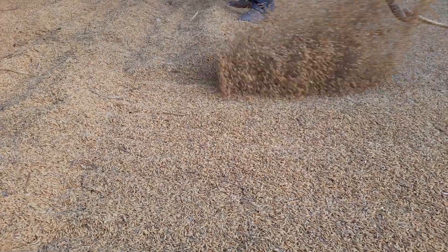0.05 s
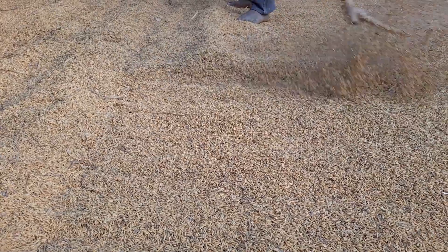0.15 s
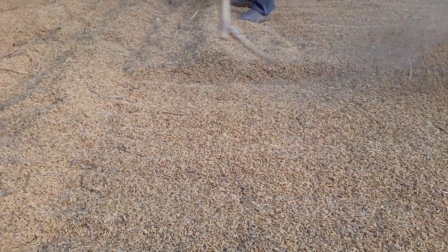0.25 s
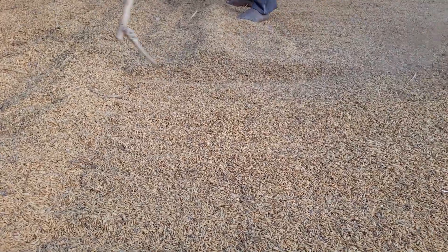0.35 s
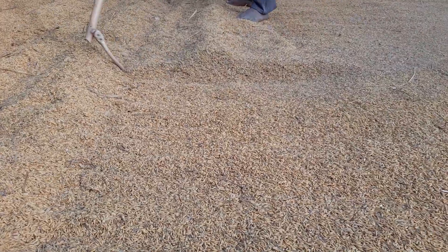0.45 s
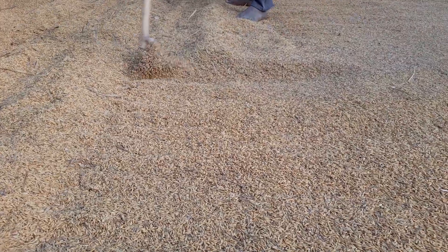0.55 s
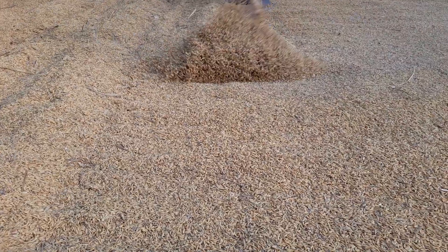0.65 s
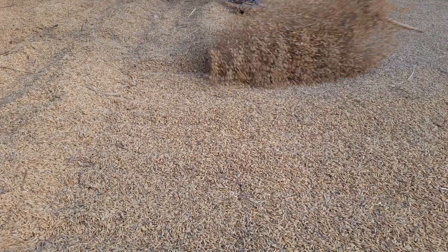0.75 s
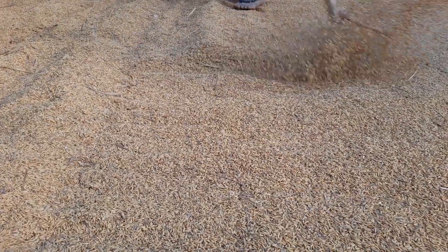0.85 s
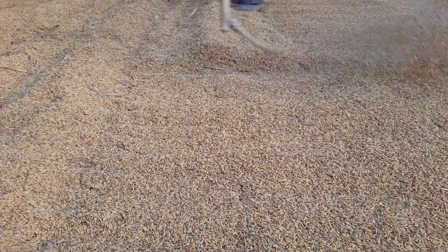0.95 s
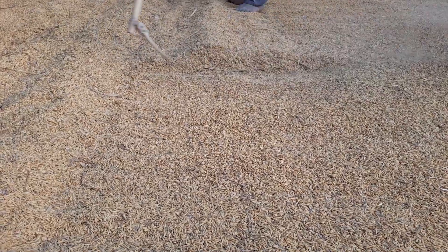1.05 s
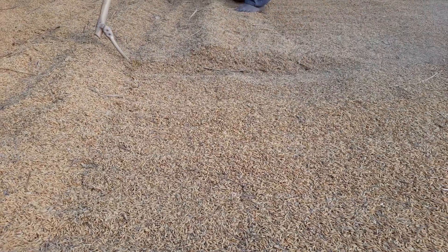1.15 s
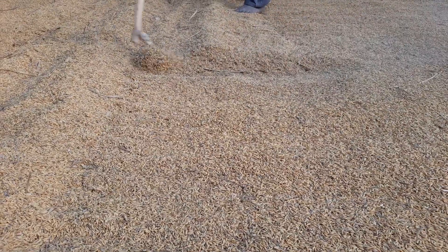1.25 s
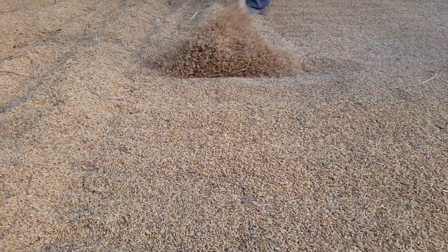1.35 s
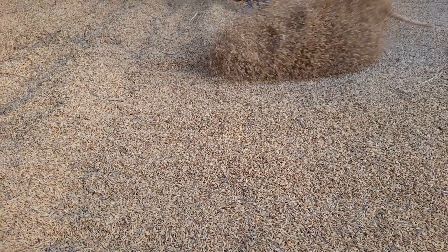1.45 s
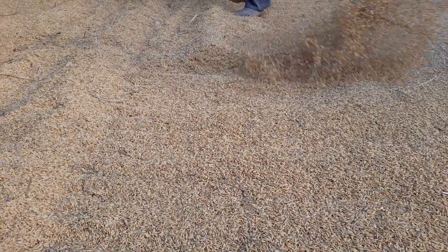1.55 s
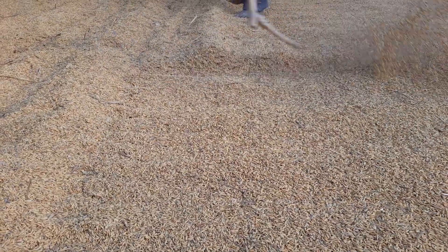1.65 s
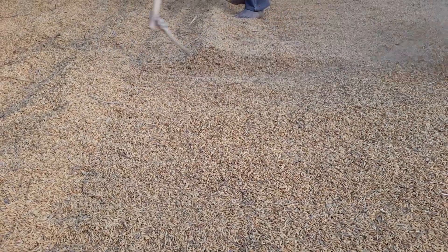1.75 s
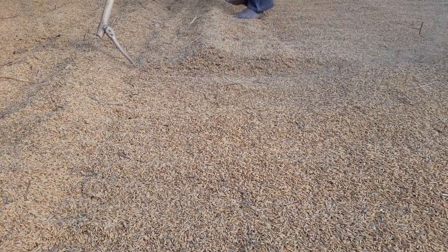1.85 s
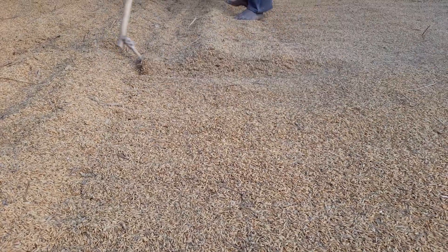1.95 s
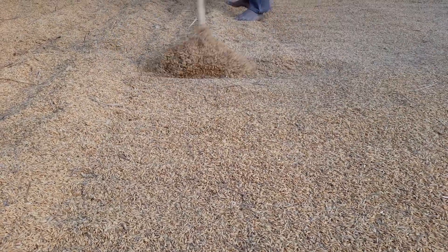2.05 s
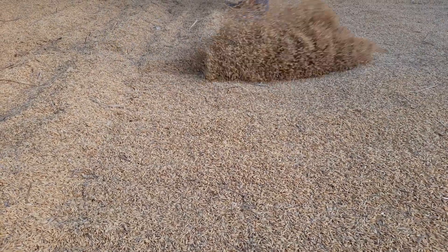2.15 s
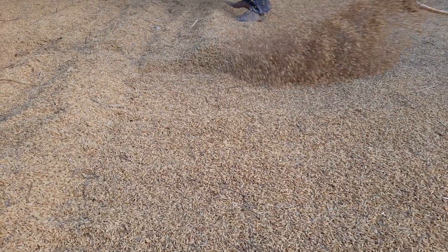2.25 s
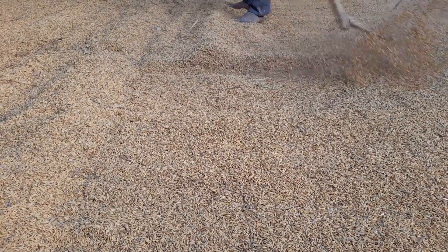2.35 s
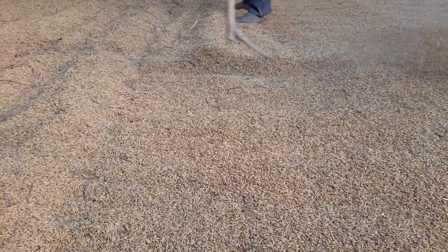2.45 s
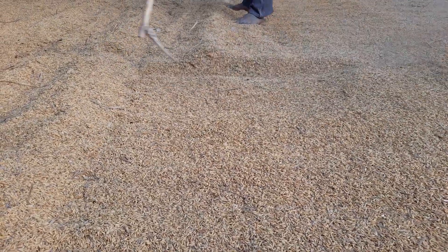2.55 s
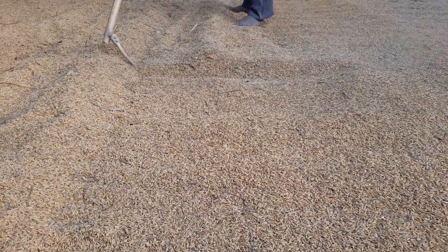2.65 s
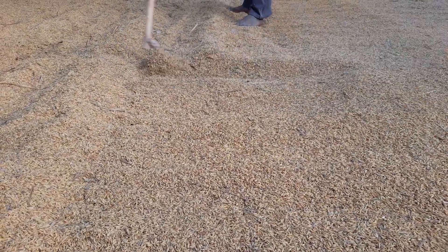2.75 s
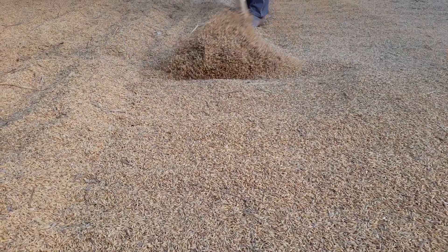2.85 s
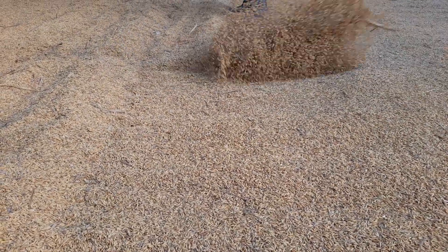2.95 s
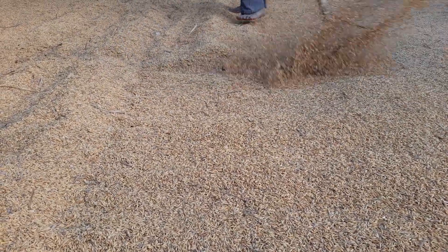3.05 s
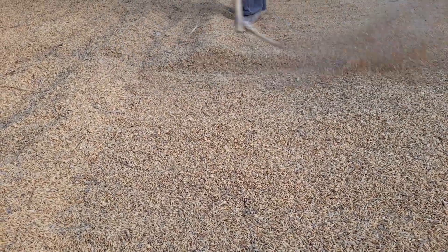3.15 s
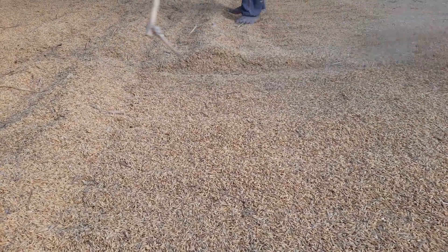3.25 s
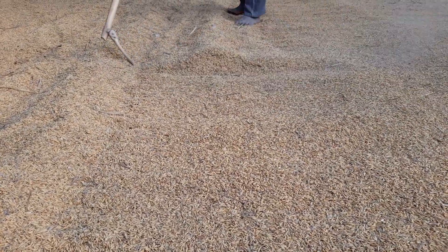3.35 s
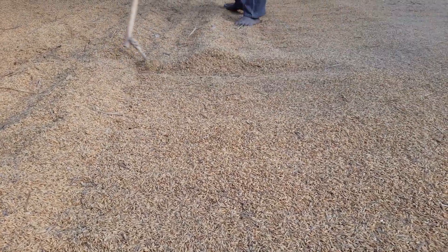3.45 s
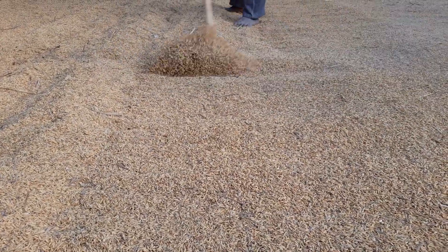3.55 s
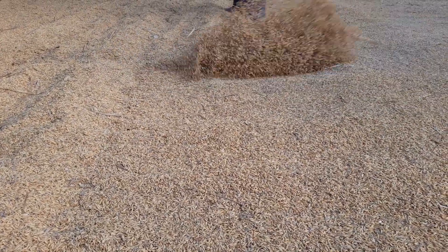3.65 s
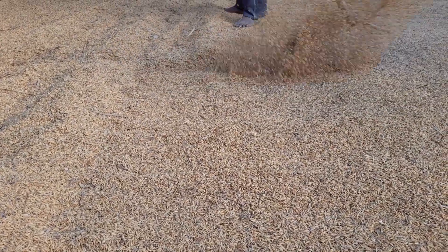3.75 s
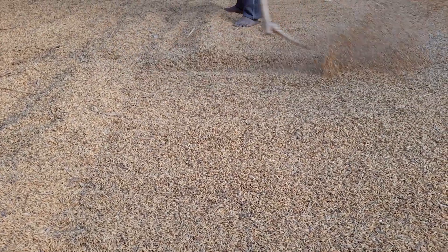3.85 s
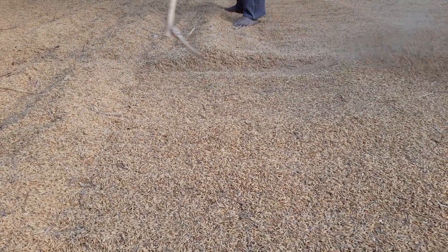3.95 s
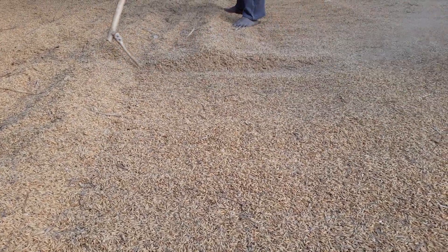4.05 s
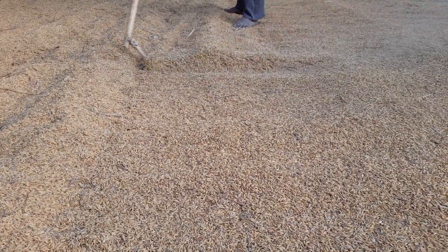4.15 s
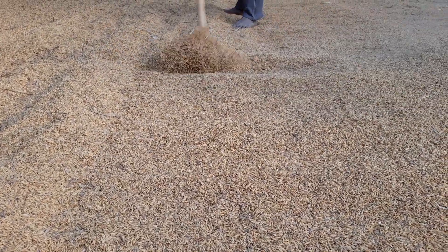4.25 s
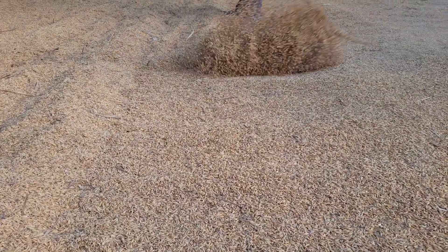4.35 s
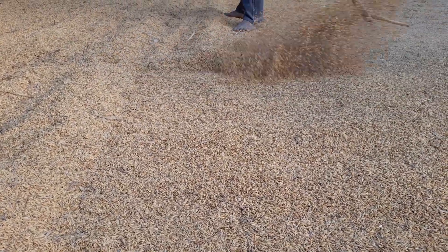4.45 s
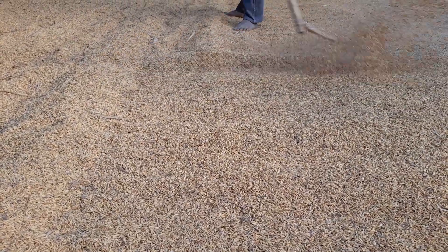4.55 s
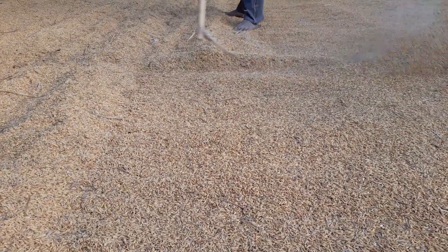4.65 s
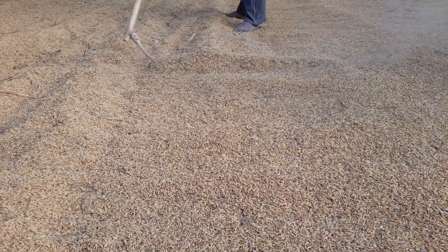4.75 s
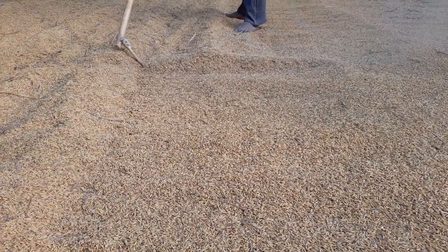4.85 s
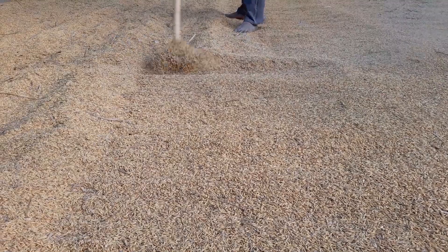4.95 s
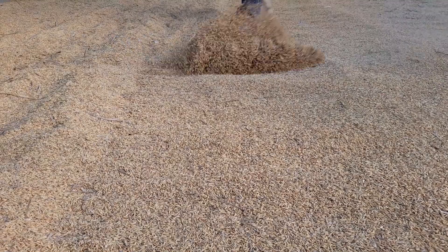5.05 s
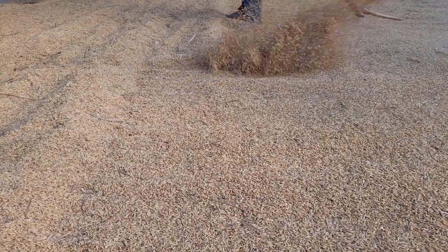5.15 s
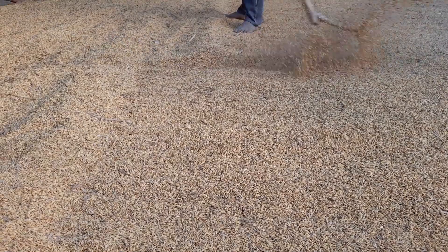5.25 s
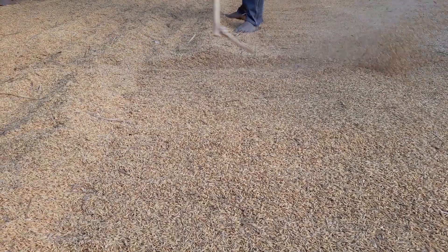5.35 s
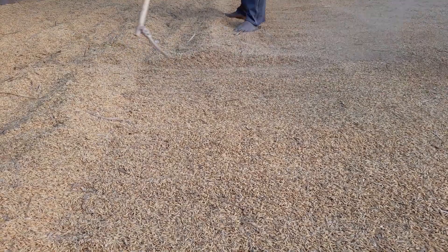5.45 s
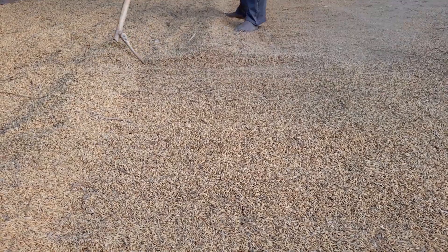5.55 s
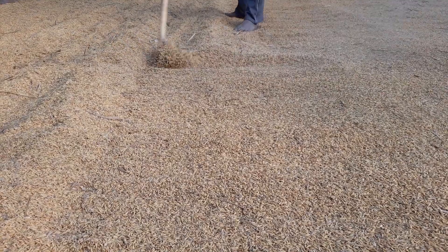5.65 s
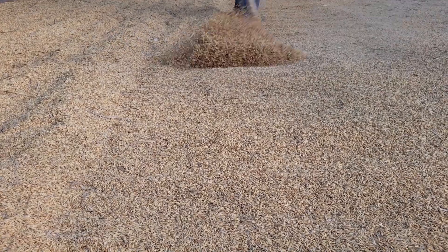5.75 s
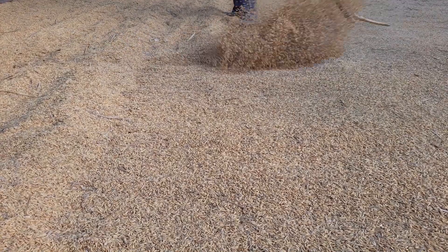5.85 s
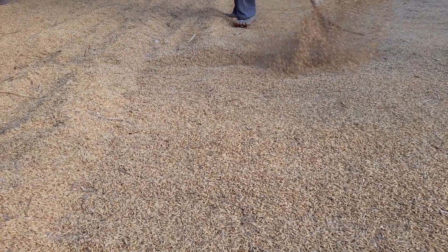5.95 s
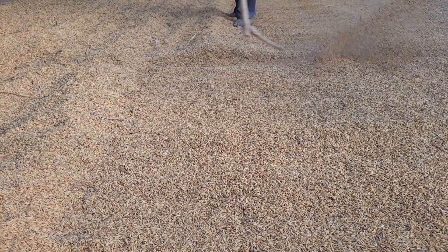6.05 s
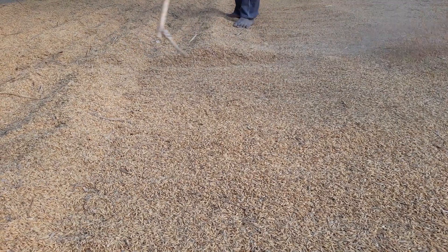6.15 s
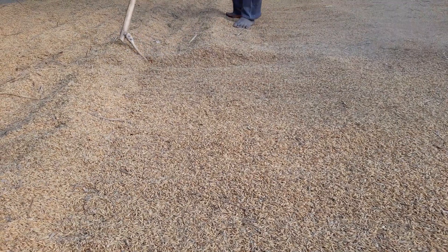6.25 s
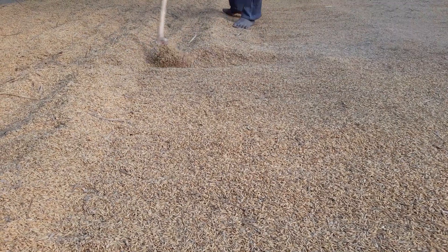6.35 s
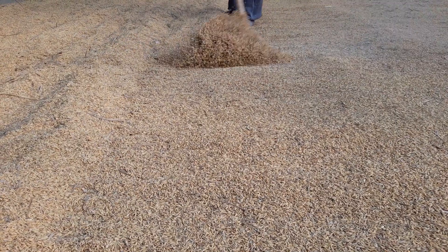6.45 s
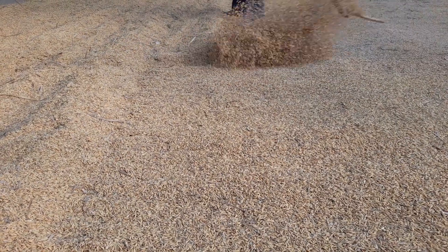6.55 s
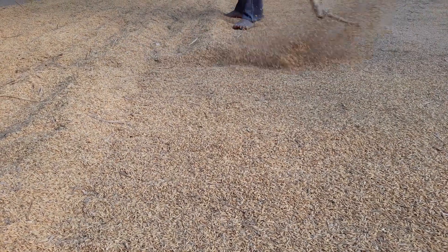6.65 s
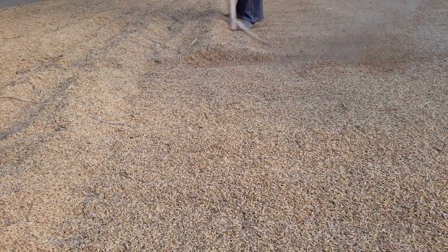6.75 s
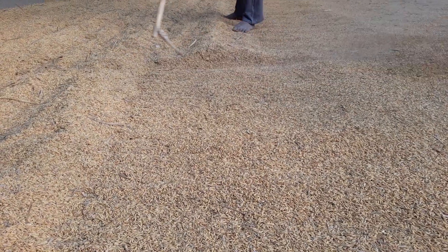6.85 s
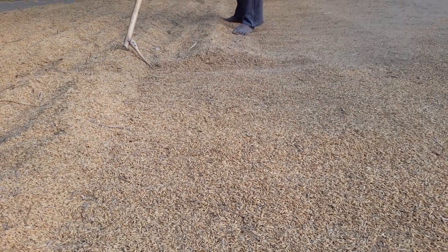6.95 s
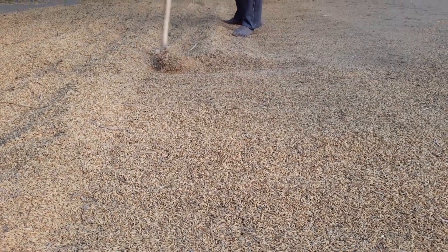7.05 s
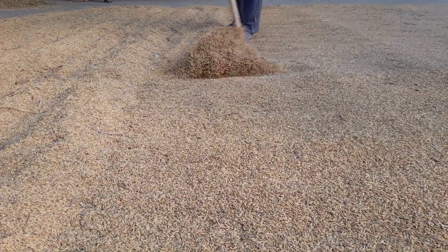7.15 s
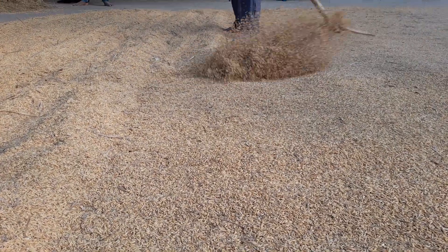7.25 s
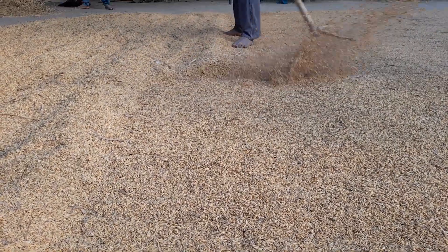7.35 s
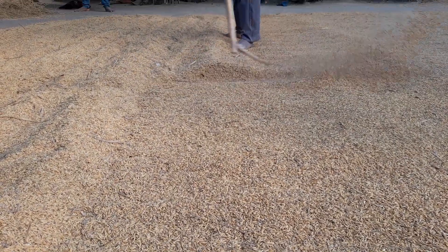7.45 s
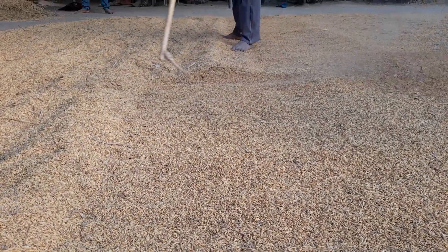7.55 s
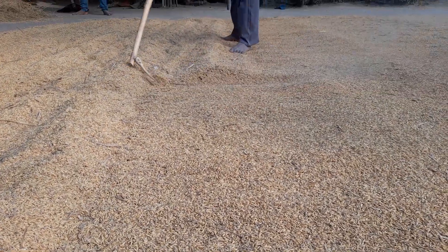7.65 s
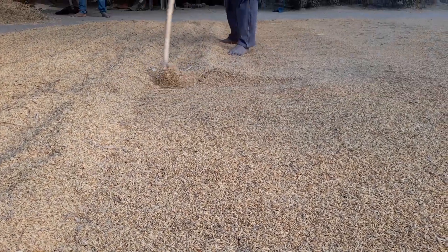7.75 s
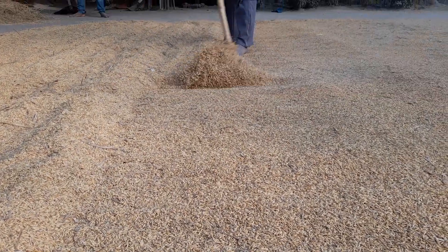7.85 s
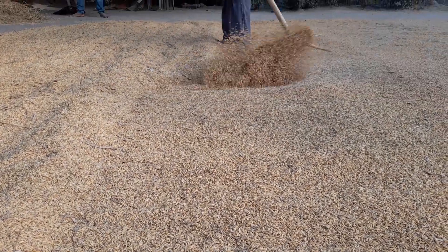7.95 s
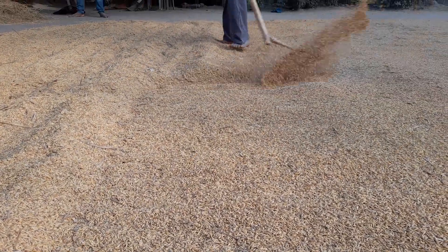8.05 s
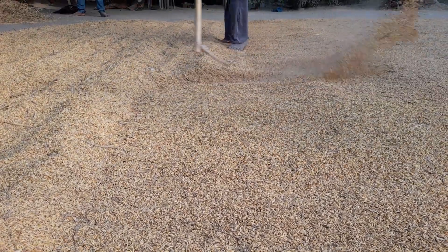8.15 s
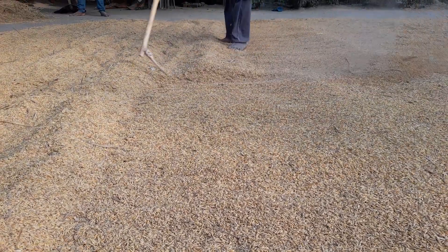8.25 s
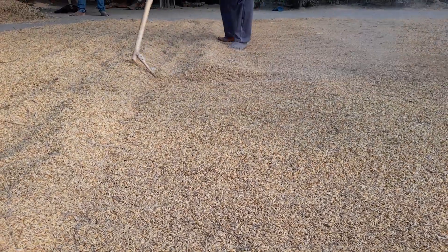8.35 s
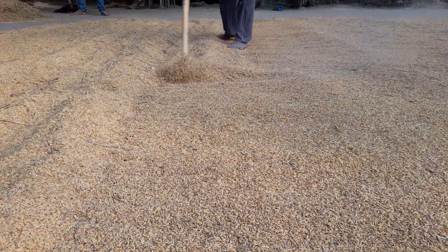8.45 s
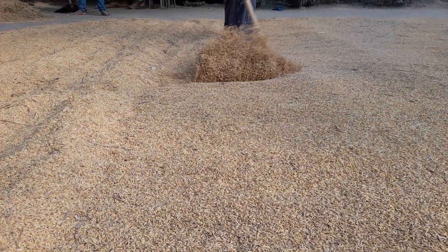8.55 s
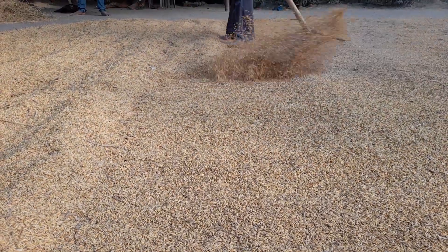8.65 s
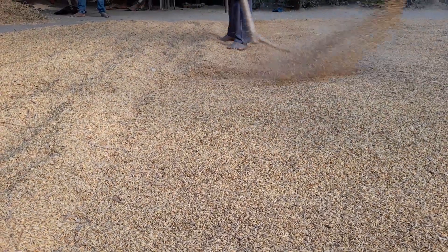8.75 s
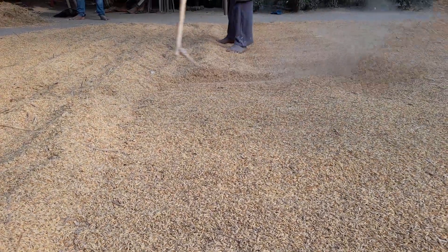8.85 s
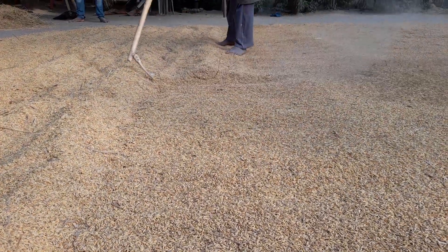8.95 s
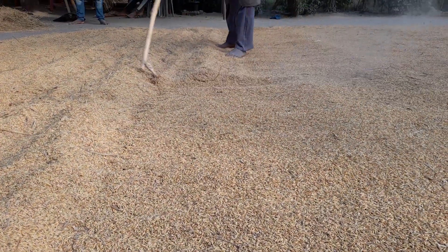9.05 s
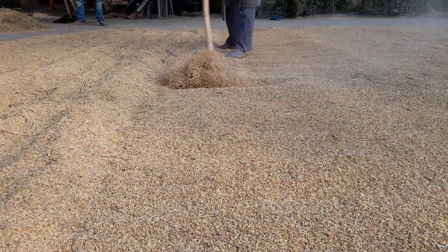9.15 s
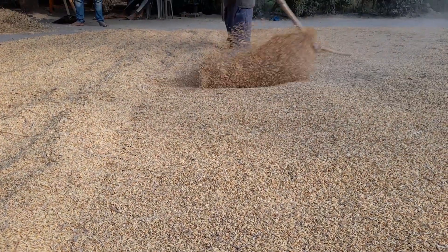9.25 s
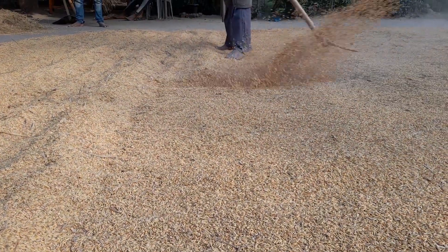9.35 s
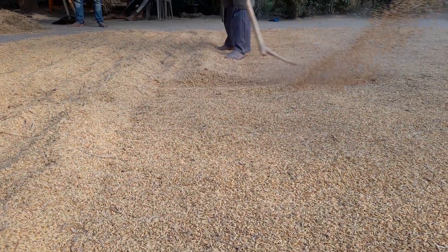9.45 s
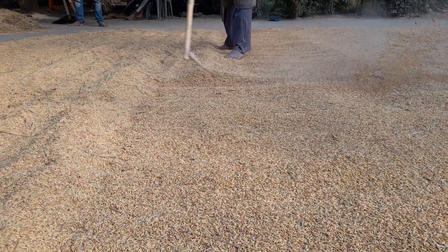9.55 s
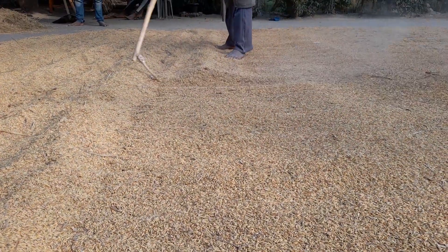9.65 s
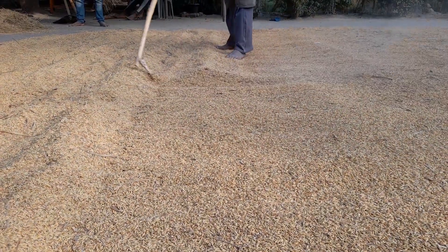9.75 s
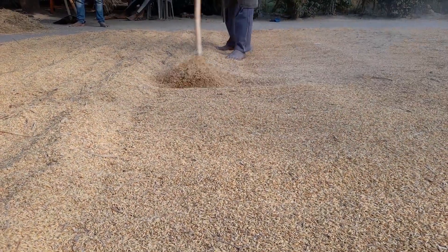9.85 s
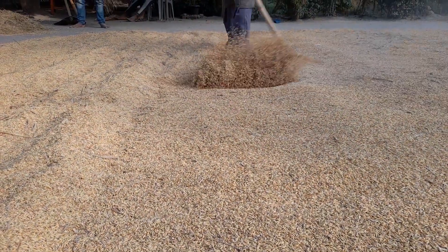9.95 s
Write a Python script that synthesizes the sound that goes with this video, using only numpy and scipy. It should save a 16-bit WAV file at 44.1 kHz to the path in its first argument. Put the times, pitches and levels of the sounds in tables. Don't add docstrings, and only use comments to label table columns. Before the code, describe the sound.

A metal-tined rake scrapes through grain on concrete in quick steady strokes, each throwing a hissing spray that patters down and trickles away.

```python
import sys
import numpy as np
from scipy import signal
from scipy.fft import rfft, irfft
from scipy.io import wavfile
from scipy.ndimage import map_coordinates

SR = 44100
rng = np.random.default_rng(int(sys.argv[2]) if len(sys.argv) > 2 else 0)


def field_ratio(decibels):
    return 10 ** (np.asarray(decibels, dtype=float) / 20)


def transcribe(u):
    v = np.clip(np.atleast_2d(u).T, -1, 1)
    q = np.round(v * 32767).astype(np.int16)
    wavfile.write(sys.argv[1], SR, q)


N = 440559
TIME = np.arange(N) / SR
HZ = np.fft.rfftfreq(N, 1 / SR) + 1e-3

STROKE_LAG, YARD_LAG = 6.5e-5, 0.000169

# lift-off [t/s], push length [t/s], tine scrape [level/dB],
# heap rumble and grain hiss [level/dB over scrape]
STROKES = [(0.035, 0.29, -27.5, -6.5, -1.5), (0.756, 0.2, -30.5, -8.5, 0), (1.467, 0.2, -31.5, -9.5, 2.6),
           (2.207, 0.2, -29.5, -8, -0.5), (2.957, 0.19, -29, -10, -0.5), (3.691, 0.19, -28, -12, -2),
           (4.389, 0.2, -28.9, -10.5, -0.2), (5.122, 0.2, -29, -9.5, -3), (5.846, 0.2, -29.5, -13.5, -0.2),
           (6.541, 0.18, -30.5, -9, 1), (7.254, 0.19, -30, -8.5, -0.6), (7.952, 0.2, -32.5, -13, 0),
           (8.619, 0.18, -32, -10.5, -0.7), (9.276, 0.17, -30, -10.5, -0.2), (10.0, 0.17, -31, -8.5, -1)]
# share of its length from bite to lift-off [0-1], scrape, heap, hiss [level/dB]
PUSH = [
    (-.3, -30, -43, -17),
    (0, -14.5, -10, -13.5),
    (.25, -6.5, -2, -8),
    (.65, 0.5, -2.5, -1.5),
    (.88, -1, -17, 1),
    (1.0, -14, -13.5, -8),
    (1.1, -25.5, -24, -13.5),
]
# first kernels [t/s], length [t/s], patter [level/dB], thud [level/dB over patter]
LANDINGS = [(0.049, 0.2, -37.5, -9.5), (0.806, 0.22, -37.5, -17.5), (1.497, 0.17, -40.5, -19),
            (2.252, 0.19, -40, -20), (3.011, 0.16, -37.5, -36), (3.73, .17, -46, -27),
            (4.445, 0.19, -41.5, -37), (5.159, 0.18, -40.5, -18.5), (5.902, 0.19, -45.5, -38),
            (6.582, 0.18, -41.5, -21), (7.29, 0.18, -39.5, -43), (7.977, 0.16, -43, -23),
            (8.662, 0.15, -39.5, -42), (9.313, 0.2, -46, -20)]
# thickest moment [t/s], shower [level/dB], trickle left in the air [level/dB over it]
CHAFF = [(.198, -30.5, -4.5), (.906, -31.5, -3.5), (1.625, -27, -8.5), (2.358, -29, -7.5),
         (3.11, -32.5, -3), (3.855, -34.5, -0.5), (4.586, -32, -2), (5.285, -31, -5.5), (6.042, -32.5, -4),
         (6.69, -31.5, -6), (7.41, -34.5, -3), (8.09, -41.5, 5), (8.75, -38, 2.5), (9.44, -36.5, 1.5)]
# pitch [f/Hz], width [f/Hz], strength [level/dB]
RAKE = [(287.5, 10, -10.5), (465, 55, -16), (992, 38, -4), (1560, 41, -5.5), (1990, 43, -0.5),
        (2353, 190, -9), (2665, 64, 3.5), (2400, 480, -21.5), (3613, 23, -1.5), (4877, 105, -1.5),
        (7290, 670, -5)]
# pitch [f/Hz], likeness [-1 to 1]
YARD_ALIKE = [(60, 0.58), (500, 0.29), (1600, 0.3), (2400, 0.2), (3300, 0.14), (15000, 0)]
# pitch [f/Hz], balance [level/dB]
YARD_PAN = [(60, 1), (400, -1), (1000, 2), (2400, -2), (6000, -2), (9500, 10), (11500, 5), (14000, 8.5),
            (15600, 8.5)]


def rms_one(x):
    return x / np.sqrt(np.mean(x ** 2) + 1e-20)


def at_hz(points):
    hz, value = np.transpose(points)
    return np.interp(np.log(HZ), np.log(hz + 1), value)


def bursts(events, shape, ends_at_time=False, fade_s=.045, fall_db=32):
    rows, shape = [], np.array(shape)
    for start_s, length_s, level_db, *over_db in events:
        times = start_s + length_s * (shape[:, :1] - ends_at_time)
        levels = shape[:, 1:] + level_db + np.r_[0, over_db]
        table = np.hstack([times, levels])
        before = np.r_[-fade_s, np.full(len(over_db) + 1, -fall_db)]
        after = np.r_[fade_s, np.full(len(over_db) + 1, -fall_db)]
        rows += [table[0] + before, *table, table[-1] + after]
    s, *levels_db = np.transpose(rows)
    return [field_ratio(np.interp(TIME, s, db)) for db in levels_db]


def drift(rate):
    step = 20
    r = np.exp(-2 * np.pi * rate * step / SR)
    slow = signal.lfilter([1], [1, -2 * r, r * r], rng.standard_normal(N // step + 2002))
    slow = np.clip(rms_one(slow[2000:]), -2, 2)
    return np.interp(np.arange(N) / step, np.arange(len(slow)), slow)


def kernels(per_s, spread_db):
    sizes = field_ratio(spread_db * np.minimum(rng.exponential(1, N), 3.1))
    hits = rng.random(N) < per_s / SR
    return sizes * hits * rng.standard_normal((2, N))


def resonate(x, modes):
    out = 0
    for hz, width_hz, level_db in modes:
        r = np.exp(-np.pi * width_hz / SR)
        poles = [1, -2 * r * np.cos(2 * np.pi * hz / SR), r * r]
        out = out + field_ratio(level_db) * signal.lfilter([1 - r, 0, r - 1], poles, x + 1e-18)
    return out


def at_the_ports(streams, colour, alike, pan, lag_s, low_hz=1, high_hz=1e5):
    mid, side = rfft(streams)
    zone = 1 / np.sqrt((1 + (low_hz / HZ) ** 6) * (1 + (HZ / high_hz) ** 6))
    c = np.clip(at_hz(alike), -1, 1)
    ports = np.sqrt(1 + c) * mid + np.sqrt(1 - c) * side * [[1], [-1]]
    ports[1] *= np.exp(-2j * np.pi * HZ * lag_s)
    level_db = at_hz(colour) + at_hz(pan) * [[.5], [-.5]]
    out = irfft(ports * zone * field_ratio(level_db), N)
    return out / np.sqrt(np.mean(out.mean(axis=0) ** 2))


def patchy(x, spread_db, span_s, span_hz):
    hz, s, cells = signal.stft(x, SR, nperseg=512)
    where = np.meshgrid(hz / span_hz, s / span_s, indexing="ij")
    patches = map_coordinates(rng.standard_normal((80, 500)), where, order=1, mode="wrap")
    return signal.istft(cells * field_ratio(spread_db * patches), SR, nperseg=512)[1][:, :N]


def rumble():
    # time [t/s], loudness [level/dB]
    far = [(0, -63), (.5, -67.5), (1.0, -68), (2.0, -66), (3.0, -64), (4.1, -62.5), (4.55, -66), (5.4, -64),
           (5.82, -60), (6.23, -62), (6.8, -63.5), (7.7, -64), (8.1, -66), (8.7, -60.5), (8.9, -61),
           (9.3, -54.5), (9.7, -66), (9.99, -65)]
    # pitch [f/Hz], density [level/dB per Hz]
    colour = [(15, -50), (28, -18), (55, -7), (94, -3.5), (130, -8), (170, -16), (300, -15), (600, -24.5),
              (1000, -35.5)]
    # start [t/s], length [t/s], loudness [level/dB]
    gusts = [(3.8, .25, -61), (5.45, 0.16, -59), (8.0, 0.22, -75), (8.72, 0.4, -57.5)]
    # share of its length [0-1], loudness [level/dB]
    swell_shape = [
        (0, -33),
        (.2, 2.5),
        (1.0, -12),
    ]
    place = colour, YARD_ALIKE, YARD_PAN, YARD_LAG
    low = at_the_ports(rng.standard_normal((2, N)), *place)
    wind = at_the_ports(rng.standard_normal((2, N)), *place, low_hz=152)
    swell = bursts(gusts, swell_shape)[0] * field_ratio(1.0 + 1.7 * drift(17))
    lumps = field_ratio(2.2 * drift(10))
    scrape = bursts(STROKES, PUSH, True)[0]
    thump = field_ratio(-52) * scrape ** 0.77
    s, level_db = np.transpose(far)
    return (field_ratio(np.interp(TIME, s, level_db)) + thump) * lumps * low + swell * wind


def trickle():
    # pitch [f/Hz], density [level/dB per Hz]
    colour = [(150, -46), (300, -22), (1200, -25.5), (2000, -24.5), (2500, -21), (3100, -20), (5500, -16),
              (7400, -15.5), (8200, -25), (10000, -14), (11500, -4.5), (13200, -1.5), (15600, -4)]
    hang_s = 0.2
    hang_loss_db, bite_loss_db, lift_loss_db = 0.4, 5, 3.5
    start, length_s, *_ = np.transpose(LANDINGS)
    lift, push_s = np.transpose(STROKES[1:])[:2]
    full_db = np.array([db + over_db for _, db, over_db in CHAFF])
    landed = start + length_s
    s = np.ravel([landed, landed + hang_s, lift - push_s, lift], "F")
    level_db = np.ravel([full_db, full_db - hang_loss_db, full_db - bite_loss_db, full_db - lift_loss_db], "F")
    s, level_db = np.r_[0, s], np.r_[full_db[0] - lift_loss_db, level_db]
    sifting = at_the_ports(kernels(20000, 0.46), colour, YARD_ALIKE, YARD_PAN, YARD_LAG)
    return field_ratio(np.interp(TIME, s, level_db) + 1.3 * drift(27)) * sifting


def snaps():
    # time [t/s], peak [level/dB], body and edge [level/dB over peak], left over right [level/dB]
    stray = [(3.8417, -41, -24, -4, 16), (4.13, -33, -17, 2, 22.5), (4.7332, -47, -15, 8, 13),
             (4.749, -41.5, -21, 5, 18), (5.1767, -42.5, -12, 4.5, 21), (5.225, -41, -5, -12, 19),
             (5.284, -30.5, -24, -7, 21), (5.3196, -30, -27, -3, 17), (5.4743, -27.5, -34, -1.5, 25),
             (5.5408, -38, -12.5, -4, 17.5), (6.1684, -41, -7, -7, 15), (6.65, -33, -14.5, -22, 21),
             (6.8456, -48, -11, 2, 9), (6.958, -44, -15, -9, 13), (9.4774, -40, -32, 9, 5)]
    out, t = np.zeros((2, N)), TIME[:900]
    rattles = rng.standard_normal((len(stray), len(t)))
    zones_hz = [1290, 3600], [283, 860], [4200, 6900]
    bands = [signal.butter(3, zone, "band", fs=SR, output="sos") for zone in zones_hz]
    for (s, peak_db, body_db, edge_db, pan_db), rattle in zip(stray, rattles):
        burst = rattle * (0.24 * np.exp(-t / 0.0013) + 0.33 * np.exp(-t / 0.0016))
        burst = burst + 3.0 * (t == 0)
        levels_db = [0, body_db + 15.5, edge_db]
        snap = sum(field_ratio(db) * signal.sosfilt(band, burst) for db, band in zip(levels_db, bands))
        at = round(s * SR)
        out[:, at:at + len(t)] += field_ratio(peak_db + 8 + pan_db * np.array([[.5], [-.5]])) * snap
    return out


def landings():
    # share of its length [0-1], patter and thud [level/dB]
    fall = [
        (0, -12, -4.5),
        (.3, -5, 3),
        (.6, -2.5, -1),
        (.85, 0, -6),
        (1.0, -12, -13),
        (1.25, -32, -15.5),
    ]
    # share of its rise time [0-1 and on], loudness [level/dB]
    shower = [
        (0, -14.5),
        (.5, -3),
        (1.0, 3),
        (1.5, -9.5),
        (2.4, -6.5),
        (3.6, -17),
    ]
    # start [t/s], length [t/s], loudness [level/dB]
    brushes = [(.11, 0.066, -42.5), (.84, 0.22, -45.5), (2.25, 0.085, -62), (3.84, 0.09, -66),
               (8.05, .2, -63)]
    # share of its length [0-1], loudness [level/dB]
    brush = [
        (0, -4),
        (.2, 1.5),
        (.9, -1.5),
        (1.1, -13),
    ]
    # pitch [f/Hz], density [level/dB per Hz]
    colour = [(120, -57), (200, -31.5), (415, -26.5), (771, -30), (1360, -13.5), (2390, -15), (2660, -12.5),
              (2970, -16), (4350, -13.5), (8550, -13.5), (13700, -3), (15600, -2)]
    # pitch [f/Hz], likeness [-1 to 1]
    alike = [(60, .5), (600, 1), (1500, 0.59), (4000, 0.68), (10000, 0.19), (15000, 0.12)]
    # pitch [f/Hz], balance [level/dB]
    pan = [(60, -2), (400, 0.5), (1000, 1.5), (2400, -0.5), (6000, 1), (9500, -1.5), (11500, 1.5),
           (14000, 16), (15600, 8)]
    # pitch [f/Hz], width [f/Hz], strength [level/dB]
    ground = [(550, 67, 8.5), (1560, 330, 0.5), (2724, 49, 5), (3604, 140, 7), (4380, 390, 3.5),
              (5000, 410, -2), (6800, 230, 2), (7800, 220, 2.5), (9370, 190, 9.5), (10510, 250, 11),
              (12200, 260, -6)]
    patter, thud = bursts(LANDINGS, fall)
    chaff, = bursts([(s, 0.1, db) for s, db, _ in CHAFF], shower, True)
    thud = thud + bursts(brushes, brush)[0]
    place = colour, alike, pan, -0.000086
    rain = kernels(22000, 1.6)
    rain = rain + field_ratio(-3.5) * resonate(rain, ground)
    out = patter * field_ratio(0.43 + 2.5 * drift(49)) * at_the_ports(rain, *place, 870, 7830)
    out += thud * field_ratio(-3.5 + 2.0 * drift(25)) * at_the_ports(rain, *place, high_hz=810)
    flurry = field_ratio(1.4 * drift(35))
    return out + chaff * flurry * field_ratio(-1.0) * at_the_ports(rain, *place, low_hz=8450)


def knocks():
    # time [t/s], peak [level/dB]
    catches = [(0.1273, -24), (0.5704, -22.5), (0.605, -31), (1.3592, -15), (2.0695, -20), (2.139, -9.5),
               (2.803, -31), (3.5426, -30), (3.579, -16), (3.6145, -18), (3.63, -11), (4.298, -14.5),
               (4.926, -23), (4.997, -17), (5.062, -14), (5.663, -27), (6.4667, -17), (6.477, -6),
               (7.1317, -15), (7.2049, -9.5), (7.848, -18), (7.8825, -10), (8.486, -14.5), (8.5652, -12),
               (9.1758, -22), (9.8523, -23), (9.906, -15)]
    clicks = np.zeros(N)
    for s, peak_db in catches:
        clicks[round(s * SR)] = field_ratio(peak_db)
    t = TIME[:100]
    tine = np.sin(np.pi * t / t[-1]) ** 2 * np.sin(2 * np.pi * 2480 * t)
    catch = np.convolve(clicks, tine)[:N]
    rung = catch + field_ratio(8.5) * resonate(catch, RAKE) + field_ratio(24) * resonate(clicks, RAKE[8:])
    return np.array([field_ratio(-6.0) * rung, field_ratio(-8.5) * np.roll(rung, round(STROKE_LAG * SR))])


def strokes():
    # start [t/s], length [t/s], loudness [level/dB]
    touches = [(1.18, 0.043, -50), (2.725, 0.021, -64), (4.135, .05, -41), (5.61, 0.013, -70),
               (6.282, 0.021, -48), (7.0, 0.022, -51), (7.667, .035, -46.5), (8.35, 0.05, -52),
               (9.76, 0.043, -47)]
    # share of its length [0-1], loudness [level/dB]
    scuff = [
        (0, -3.5),
        (.8, -8),
        (1.2, -26),
    ]
    # pitch [f/Hz], density [level/dB per Hz]
    colour = [(53, -62), (90, -16.5), (209, -19.5), (288, -9.5), (350, -11.5), (830, -8), (1200, -8.5),
              (2600, -5), (3030, -9.5), (5200, -15), (8300, -21.5), (10500, -11.5), (14000, -6),
              (15600, -11)]
    # pitch [f/Hz], likeness [-1 to 1]
    alike = [(60, 0.94), (250, 0.94), (1200, 0.88), (2600, 0.74), (4000, 0.66), (6500, 0), (15000, 0.22)]
    # pitch [f/Hz], balance [level/dB]
    pan = [(60, -5), (400, 0.5), (1000, .5), (2400, 0.5), (6000, 2.5), (9500, -0.5), (11500, 2.5),
           (14000, 6), (15600, 12.5)]
    scrape, heap, hiss = bursts(STROKES, PUSH, True)
    scrape = scrape + bursts(touches, scuff, fade_s=0.003)[0]
    place = colour, alike, pan, STROKE_LAG
    judder = kernels(8000, 4.2) * field_ratio(2.67 * drift(28))
    rung = resonate(judder, RAKE)
    flat = [(1, 0), (2, 0)]
    humming = at_the_ports(rung, flat, *place[1:], high_hz=1190)
    humming = scrape ** 0.46 * heap ** 0.51 * field_ratio(-2) * humming
    singing = scrape * field_ratio(-6.5) * at_the_ports(rung, flat, *place[1:], 2160, 3000)
    rubbing = scrape * field_ratio(-4.5) * at_the_ports(kernels(12000, 1.7), *place, 840, 5000)
    tines = field_ratio(1.16 * drift(57)) * (humming + singing + rubbing)
    bulk = heap * field_ratio(-0.5 + 4.8 * drift(21)) * at_the_ports(kernels(3000, 2.6), *place, high_hz=806)
    spray = kernels(25000, 0.99)
    spray = spray + field_ratio(7.0) * resonate(spray, RAKE[8:])
    coarse_level = hiss ** 0.69 * scrape ** 0.28 * field_ratio(-5.5 + 2.2 * drift(54))
    coarse = coarse_level * at_the_ports(spray, *place, 4600, 9200)
    fine = hiss * field_ratio(-3.0 + 2.0 * drift(24)) * at_the_ports(spray, *place, low_hz=8100)
    return patchy(tines + bulk, 1.6, .05, 415) + patchy(coarse + fine, 2.6, 0.055, 1092)


def scene():
    background = rumble() + patchy(trickle(), 2.05, 0.13, 1350)
    grain = snaps() + patchy(landings(), 4.7, .05, 926)
    return background + grain + knocks() + strokes()


def roll_off(x):
    return signal.sosfilt(signal.butter(12, 17080, fs=SR, output="sos"), x)


def record(dry):
    mix = irfft(rfft(dry) * (HZ < 15760), N)
    return roll_off(mix)


dry = scene()
out = record(dry)
transcribe(out)
```